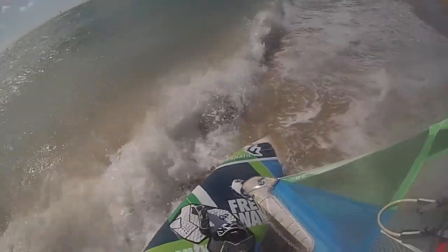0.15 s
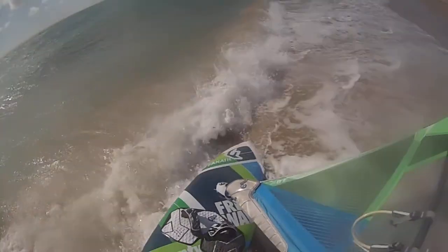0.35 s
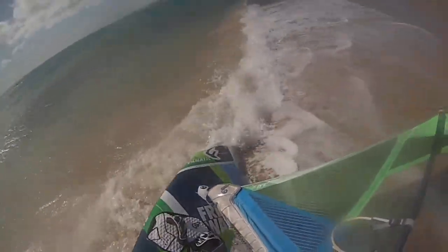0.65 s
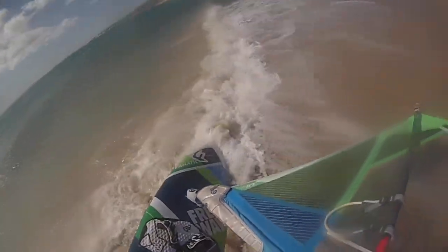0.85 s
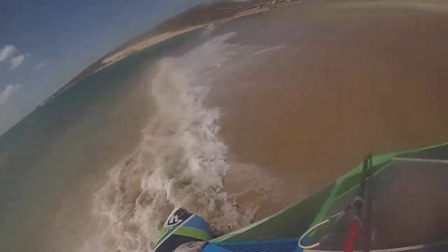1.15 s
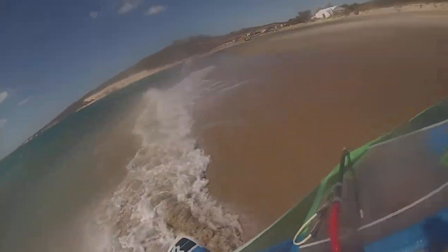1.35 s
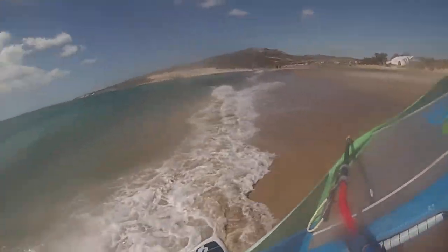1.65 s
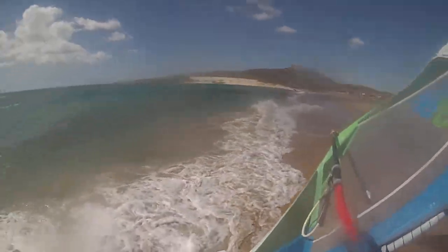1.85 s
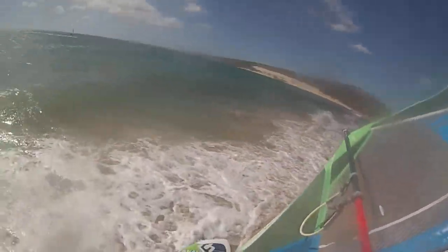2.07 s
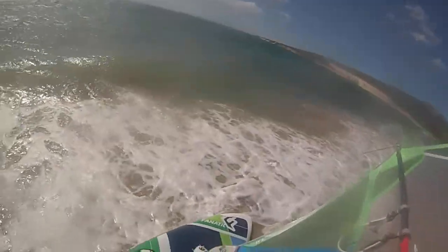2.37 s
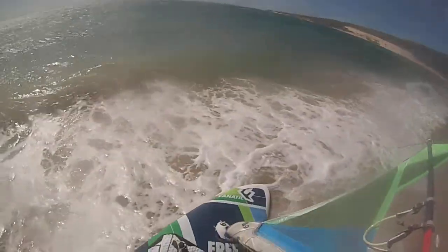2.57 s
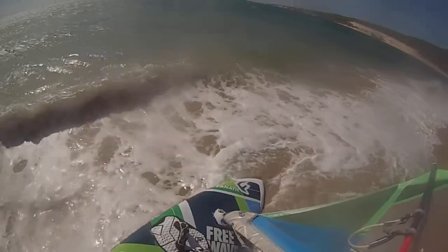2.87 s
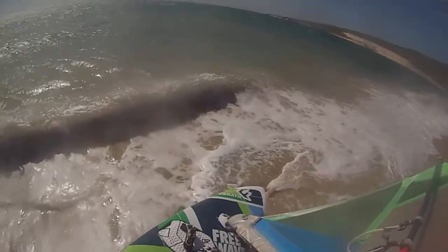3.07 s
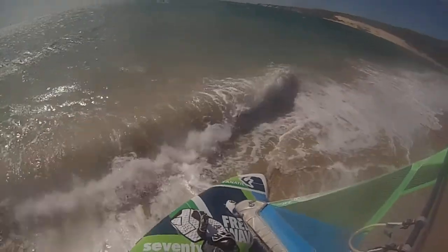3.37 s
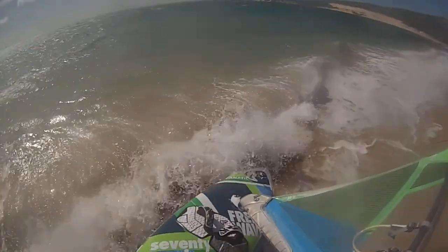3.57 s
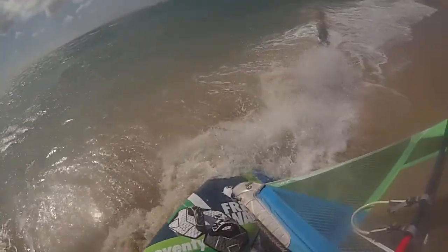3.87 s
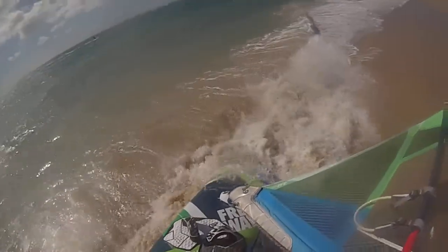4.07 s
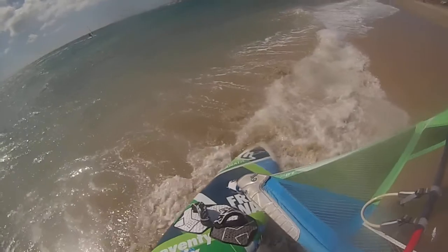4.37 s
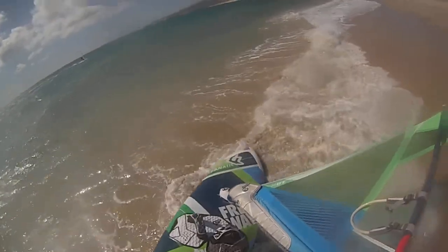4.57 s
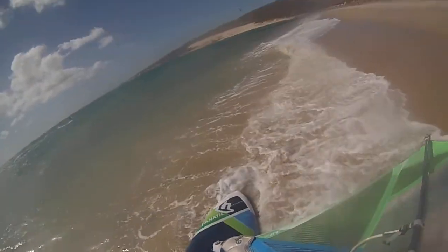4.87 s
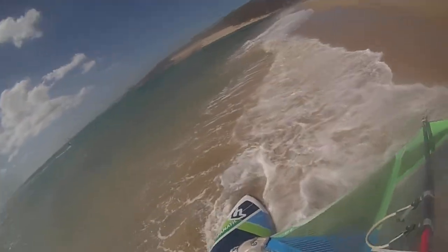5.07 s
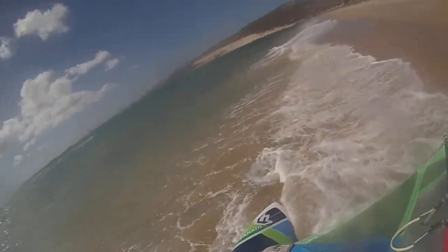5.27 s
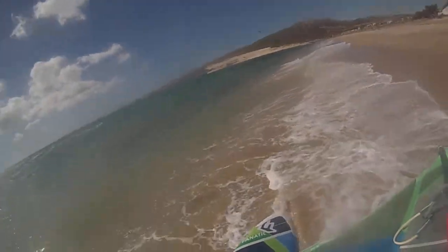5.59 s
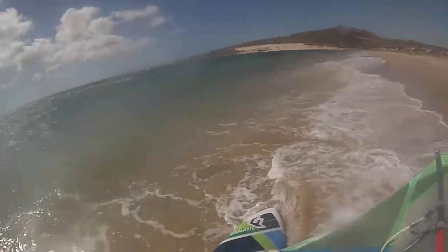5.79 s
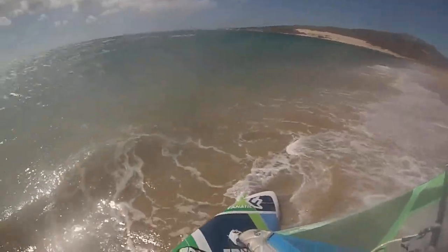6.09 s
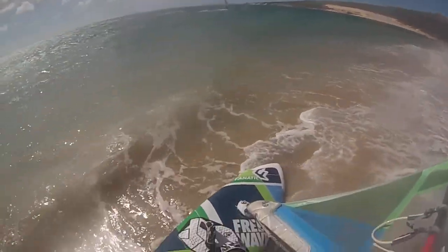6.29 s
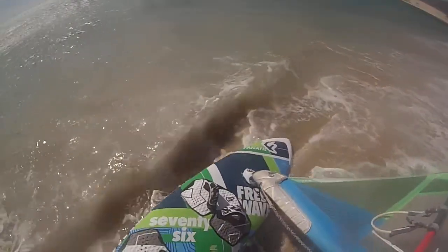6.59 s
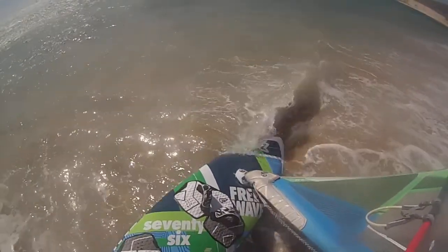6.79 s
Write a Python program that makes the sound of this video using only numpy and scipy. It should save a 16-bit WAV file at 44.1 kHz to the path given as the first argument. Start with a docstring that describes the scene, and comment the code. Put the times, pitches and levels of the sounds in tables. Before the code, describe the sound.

Close, slightly hollow surf rushes and foams in the shallows, heard from inside a small waterproof case over a steady sea hiss and low puffs of wind. An early dull knock on a sailboard is followed by a cluster of splashes, slaps and rattles from the case's mount. Another wave surges, a short raspy wind whistle passes, and the water eases, then rises with more splashes.

```python
"""Shore break round a board

On the sand, down in the wash, with one microphone shut in a small waterproof case whose resonances
colour the surf. Wind buffets the case, drops tick on it and its mount rattles. Close by, water splashes
and slaps the board, which takes one dull knock, and once a gust whistles and rasps across the case.
The far sea is part of a steady hiss."""
import sys
import numpy as np
from scipy import signal
from scipy.fft import rfft, irfft
from scipy.io import wavfile

SR = 44100
rng = np.random.default_rng(int(sys.argv[2]) if len(sys.argv) > 2 else 0)


def transcribe(u):
    """Save the signal u as a 16-bit wav file named by the first command-line argument.

    u: samples, shape (n,) or (channels, n), limited to [-1, 1]; the rate is SR.
    q: integer samples, one column per channel.
    """
    v = np.clip(np.atleast_2d(u).T, -1, 1)
    q = np.round(v * 32767).astype(np.int16)
    wavfile.write(sys.argv[1], SR, q)


N = 306054

# The waves coming and going. Each row: time in seconds, then wash, foam fizz and roar levels in dB.
WAVE_LEVELS = [(0, -47.5, -54, -57), (.4, -48, -55.5, -62.5), (.6, -51.5, -59.5, -61.5),
               (1.02, -55, -64.5, -66.5), (1.5, -63.5, -67.5, -76), (1.9, -67.5, -69, -74),
               (2.35, -56.5, -66.5, -65.5), (2.87, -52, -63.5, -61.5), (2.96, -48, -56.5, -57.5),
               (3.3, -49, -55, -55.5), (3.7, -46.5, -52.5, -57), (3.86, -48.5, -55.5, -61),
               (4, -54.5, -61, -67), (4.7, -54, -63.5, -65), (5.25, -60, -67, -71),
               (5.55, -64, -70.5, -71.5), (6.36, -61.5, -68, -69.5), (6.56, -52, -64, -59),
               (6.66, -46, -54.5, -61.5), (6.94, -44.5, -54, -53.5)]


def from_db(db):
    """Decibels to gain."""
    return 10 ** (np.asarray(db) / 20)


def rms_one(x):
    """Scale to rms 1."""
    return x / np.sqrt(np.mean(x ** 2) + 1e-20)


def in_time(rows):
    """Each column after the times, interpolated sample by sample."""
    times, *columns = np.transpose(rows)
    return [np.interp(np.arange(N) / SR, times, column) for column in columns]


def following(level_db, share):
    """A share of a curve's swing about its mean."""
    return share * (level_db - level_db.mean())


def drift(corner_hz):
    """Slow random wander of rms 1: coarse noise through two one-pole low-passes."""
    step, settle = 40, 2000
    pole = np.exp(-2 * np.pi * corner_hz * step / SR)
    coarse = rng.standard_normal(N // step + settle + 2)
    slow = signal.lfilter([1], [1, -2 * pole, pole * pole], coarse)[settle:]
    return np.interp(np.arange(N) / step, np.arange(len(slow)), rms_one(slow))


def band(x, low_hz, high_hz, order=2):
    """Butterworth band-pass."""
    sos = signal.butter(order, [low_hz, min(high_hz, .45 * SR)], "band", fs=SR, output="sos")
    return signal.sosfilt(sos, x)


def ring(drive, hz, t60):
    """One mode: a unit click sets off a sine of height 1 that falls 60 dB in t60 seconds."""
    r, w = from_db(-60 / (t60 * SR)), 2 * np.pi * hz / SR
    return signal.lfilter([0, np.sin(w)], [1, -2 * r * np.cos(w), r * r], drive + 1e-18)


def swell(start, length):
    """The samples a swell covers, their time from its crest, and its bell shape."""
    span = np.arange(max(0, round((start - length) * SR)), min(N, round((start + 2 * length) * SR)))
    t = span / SR - start - length / 2
    return span, t, np.exp(-.5 * (t / (0.35 * length)) ** 2)


def tone_bursts(events):
    """Each event is a tone under a bell-shaped swell."""
    out = np.zeros(N)
    for start, db, hz, length in events:
        span, t, bell = swell(start, length)
        out[span] += from_db(db) * bell * np.cos(2 * np.pi * hz * t)
    return out


def impacts(events, t60, low_ratio, high_ratio):
    """Each event is a fast-dying burst of noise in a band round its pitch."""
    out, t = np.zeros(N), np.arange(3000) / SR
    for start, db, hz in events:
        burst = rng.standard_normal(len(t)) * from_db(-60 * t / t60)
        tick = band(burst, low_ratio * hz, high_ratio * hz)
        i = round(start * SR)
        out[i:i + len(t)] += from_db(db) * tick / np.abs(tick).max()
    return out


def through_case(x):
    """The closed case colours outside sound with a chain of peaks and notches."""
    # Each row: centre in Hz, width in Hz, gain in dB.
    resonances = [(1121, 54, 7), (1353, 130, -2), (1482, 240, 7), (1658, 630, 11), (2313, 640, 14.5),
                  (2640, 260, -0.5), (2785, 280, -7), (3000, 150, 0.5), (3675, 530, 6.5), (4300, 860, -1.5),
                  (4894, 610, 8.5), (5567, 650, 9.5), (6100, 440, -1.5), (6680, 670, 5.5), (7440, 650, 3.5),
                  (7960, 450, -6), (10100, 900, -1), (10940, 1600, 6.5)]
    for hz, width_hz, db in resonances:
        a, d = from_db(db / 2), np.pi * width_hz / SR
        tuning = -2 * np.cos(2 * np.pi * hz / SR)
        x = signal.lfilter([1 + d * a, tuning, 1 - d * a], [1 + d / a, tuning, 1 - d / a], x)
    return x


def bubbles(per_s, spread_db, grain_db):
    """A pair of signals: the same uneven bubble bursts over two unrelated blurs of far ones."""
    sizes = from_db(spread_db * np.minimum(rng.exponential(1, N), 5))
    signs = rng.choice([-1, 1], N)
    bursts = sizes * signs * (rng.random(N) < per_s / SR)
    return rng.standard_normal((2, N)) + from_db(grain_db) * rms_one(bursts)


def patchy(pair, low_hz, high_hz, tilt_db, together_db, own_db, bands):
    """Bands, fed in turn by a pair of noises, swell together and flicker alone; tilt in dB an octave."""
    edges, out = np.geomspace(low_hz, high_hz, bands + 1), np.zeros(N)
    for k, (low, high) in enumerate(zip(edges, edges[1:])):
        level_db = tilt_db * np.log2(low / low_hz) + together_db + own_db * drift(18.5)
        out += band(pair[k % 2], low, high) * from_db(level_db)
    return out


def surf():
    """Low roar, tumbling wash, fizz of bursting foam and fine spray; the case colours all but the roar."""
    wash_db, fizz_db, roar_db = in_time(WAVE_LEVELS)
    spray_db = -75.5 + following(fizz_db, share=0.92)
    lapping = 0.31 * drift(7.7) + 0.34 * drift(39.0)   # the water surges in all bands at once
    rush = rng.standard_normal((2, N))
    roar = patchy(rush, 187.4, 1154, tilt_db=-3.5, together_db=.5 * lapping, own_db=2.0, bands=5)
    churn = bubbles(per_s=900, spread_db=6.1, grain_db=-10.5)
    wash = patchy(churn, 1025, 2800, tilt_db=-4.0, together_db=1.3 * lapping, own_db=1.58, bands=4)
    foam = bubbles(per_s=2500, spread_db=6.4, grain_db=-6)
    fizz = patchy(foam, 2755, 8500, tilt_db=-5.0, together_db=1.2 * lapping, own_db=0.23, bands=5)
    spray = patchy(foam, 7920, 18700, tilt_db=-10.0, together_db=.9 * lapping, own_db=-1.0, bands=4)
    layers = [(wash_db, wash), (fizz_db, fizz), (spray_db, spray)]
    coloured = sum(from_db(db) * rms_one(through_case(x)) for db, x in layers)
    return from_db(roar_db) * rms_one(roar) + coloured


def wind():
    """Wind presses on the case: lumpy low noise in three bands."""
    # Each row: time in seconds, buffeting level in dB, rumble level in dB.
    pressure = [(0, -63.5, -62), (.5, -54.5, -72), (.95, -57, -72.5), (1.1, -53, -52), (1.4, -60.5, -67.5),
                (2.05, -55, -57), (2.6, -53, -53), (3.05, -56.5, -53.5), (3.7, -56, -59), (4.2, -60, -62),
                (4.6, -55.5, -64), (5, -61.5, -69), (5.35, -59.5, -70), (5.72, -57, -72), (5.8, -61, -60.5),
                (6, -59, -58), (6.3, -69.5, -61.5), (6.75, -54, -59.5), (6.94, -79, -57)]
    buffet_db, rumble_db = in_time(pressure)
    wash_db = in_time(WAVE_LEVELS)[0]
    flutter_db = -65 + following(rumble_db, share=0.27) + following(wash_db, share=0.34)
    lumps = from_db(1.93 * drift(4.4))
    noise = rng.standard_normal((3, N))
    buffet = band(noise[0], 18.3, 41) * from_db(2.3 * drift(7.3))
    rumble = band(noise[1], 39.7, 99) * lumps
    flutter = band(noise[2], 89.5, 229.0) * lumps
    layers = [(buffet_db, buffet), (rumble_db, rumble), (flutter_db, flutter)]
    return sum(from_db(db) * rms_one(x) for db, x in layers)


def hiss():
    """Steady smooth noise of the microphone and the far sea."""
    # Each row: frequency in Hz, relative spectral density in dB.
    spectrum = [(18, -20), (30, -1.5), (815, -15), (1300, -17.5), (1520, -11), (1780, -20.5), (2310, -15),
                (2770, -21.5), (5580, -31.5), (11000, -34.5), (15000, -44)]
    corner_hz, corner_db = np.transpose(spectrum)
    hz = np.maximum(np.fft.rfftfreq(N, 1 / SR), 1)
    colour = from_db(np.interp(np.log(hz), np.log(corner_hz), corner_db))
    return from_db(-59) * rms_one(irfft(rfft(rng.standard_normal(N)) * colour, N))


def low_thumps():
    """Puffs of wind on the case, and one dull knock on the board at about 1.1 s."""
    # Each row: start in seconds, peak in dB, pitch in Hz.
    thumps = [(.16, -50, 150), (.474, -50, 43), (.987, -45, 43), (1.053, -43.5, 54.5), (1.086, -41, 110),
              (1.11, -43.5, 140), (1.798, -44, 52.4), (2, -48, 50), (2.314, -46, 35.3), (2.933, -45, 43),
              (3.178, -40, 32.8), (3.593, -41, 32), (3.923, -37.5, 46.8), (4.092, -41, 32),
              (4.526, -44, 38), (4.639, -38.5, 37), (5.483, -38.5, 27), (5.822, -48, 32),
              (6.754, -42.5, 38)]
    cycles = 1.27
    return tone_bursts([(start, db, hz, cycles / hz) for start, db, hz in thumps])


def drops():
    """Single drops tick on the case, right at the microphone."""
    # Each row: start in seconds, peak in dB, pitch in Hz.
    ticks = [(.192, -47, 5000), (.42, -40, 7500), (1.398, -42, 6400), (1.583, -47, 6030),
             (2.55, -42.5, 5500), (2.968, -48, 6000), (4.12, -49, 10000), (4.637, -44.5, 8500),
             (5.4055, -39, 6760), (5.508, -46, 9000), (5.51, -46, 3800), (6.445, -48, 8000)]
    return impacts(ticks, t60=0.0048, low_ratio=0.47, high_ratio=1.2)


def splashes_and_rasp():
    """Short bursts of hiss through the case: splashes, and the whistling gust's rasp near 4.3 s."""
    # Each row: start in seconds, rms at the crest in dB, low and high edges in Hz, length in seconds.
    bursts = [(1.075, -63, 1000, 6000, 0.041), (1.708, -59.5, 1290, 2600, 0.16),
              (2.519, -48.5, 1180, 4450, .05), (2.567, -54.5, 1100, 4000, .1),
              (2.715, -50.5, 1300, 5000, .083), (2.893, -65, 1500, 12000, .04),
              (2.967, -54, 4470, 12500, 0.04), (3.002, -50, 3400, 11500, .058),
              (4.24, -51, 2200, 3940, 0.18), (4.304, -62, 4570, 7500, 0.13), (4.45, -67, 3930, 5070, 0.94),
              (4.626, -64, 2000, 8000, 0.13), (5.58, -54, 1300, 3500, 0.021),
              (6.443, -59.5, 4000, 7000, 0.023), (6.476, -50, 300, 1290, 0.026),
              (6.593, -50.5, 1500, 9000, 0.043), (6.895, -49.5, 2000, 12000, 0.038)]
    grains = bubbles(per_s=1800, spread_db=3.1, grain_db=-3.5)[0]
    dulled = signal.lfilter([1], [1, -.75], grains)
    coloured, out = through_case(dulled), np.zeros(N)
    for start, db, low_hz, high_hz, length in bursts:
        span, _, bell = swell(start, length)
        out[span] += from_db(db) * bell * rms_one(band(coloured[span], low_hz, high_hz))
    return out


def mount_rattle():
    """A loose joint chatters for a moment and rings the modes of the case's mount."""
    # Each row: start in seconds, peak in dB, length of the chatter in seconds.
    knocks = [(1.095, -39.5, 0.0065), (1.164, -51, .004), (1.819, -55, 0.035), (2.086, -54, 0.014),
              (2.39, -55, .03), (2.545, -46, 0.0077), (2.573, -38.5, 0.019), (2.651, -39, .012),
              (2.737, -49, 0.018), (2.771, -49.5, 0.019), (2.818, -45, 0.014), (2.947, -55, .017),
              (3.143, -46, .04), (4.3, -49, 0.034)]
    # Each row: frequency in Hz, relative gain in dB, seconds to fall 60 dB.
    modes = [(1114.6, 4, 0.092), (1200, 0, 0.042), (1415, -6, .035), (1670, -5, .05), (2190, -21, .03)]
    out, t = np.zeros(N), np.arange(8000) / SR
    for start, db, length in knocks:
        envelope = (t / length) * np.exp(-2 * t / length)
        chatter = band(rng.standard_normal(len(t)) * envelope, 1050, 1780)
        rung = sum(from_db(mode_db) * ring(chatter, hz, t60) for hz, mode_db, t60 in modes)
        i = round(start * SR)
        out[i:i + len(t)] += from_db(db) * rung / np.abs(rung).max()
    return out


def board_slaps():
    """Water slaps the board, heard through the case."""
    # Each row: start in seconds, peak outside the case in dB, pitch in Hz.
    slaps = [(1.163, -55, 1500), (2.183, -64, 2300), (2.533, -56, 1700), (2.547, -59, 2200),
             (2.586, -48, 1900), (2.626, -50, 1590), (4.766, -46.5, 2350), (6.479, -46, 1510)]
    return through_case(impacts(slaps, t60=0.026, low_ratio=0.38, high_ratio=2.13))


def whistle():
    """A gust across the case blows a rough airy note, with short purer throbs that climb in pitch."""
    # Each row: time in seconds, level of the airy note in dB.
    gust = [(4.13, -69), (4.17, -48.5), (4.23, -44), (4.28, -38), (4.31, -48), (4.36, -47.5), (4.41, -53),
            (4.47, -60)]
    # Each row: start in seconds, peak in dB, length in seconds.
    throbs = [(4.182, -36.5, 0.011), (4.19, -44, .014), (4.205, -46, 0.017), (4.233, -33, .016),
              (4.254, -26, .013), (4.268, -35, .0077), (4.276, -23.5, .0083), (4.29, -29.5, 0.0058),
              (4.329, -39, .0096), (4.354, -38, 0.0088)]
    first_s, first_hz, climb_hz_per_s = throbs[0][0], 1500, 1000
    air = rms_one(band(rng.standard_normal(N), 1387, 1623, order=4))
    times, level_db = np.transpose(gust)
    envelope = np.interp(np.arange(N) / SR, times, from_db(level_db), left=0, right=0)
    tones = [(start, db, first_hz + climb_hz_per_s * (start - first_s), length)
             for start, db, length in throbs]
    return air * envelope + tone_bursts(tones)


def scene():
    """Everything meets at the one microphone, which feeds both channels."""
    hits = board_slaps() + mount_rattle() + drops() + low_thumps()
    mono = surf() + splashes_and_rasp() + wind() + whistle() + hits + hiss()
    return np.stack([mono, mono])


def record(dry):
    """A steep low-pass cuts the top of the treble."""
    cutoff_hz = 15150
    return signal.sosfilt(signal.ellip(12, .3, 70, cutoff_hz, fs=SR, output="sos"), dry)


dry = scene()
out = record(dry)
transcribe(out)
```